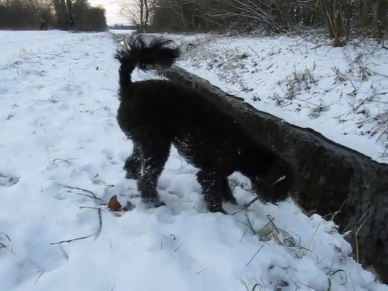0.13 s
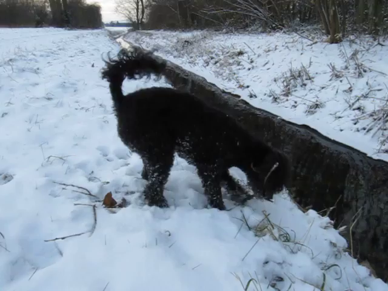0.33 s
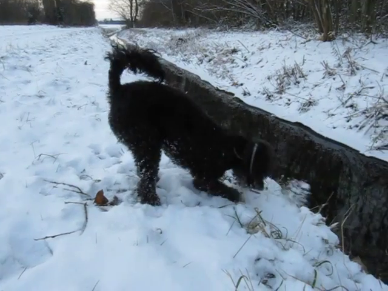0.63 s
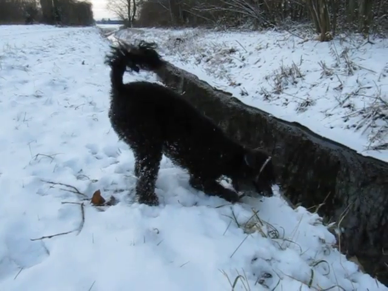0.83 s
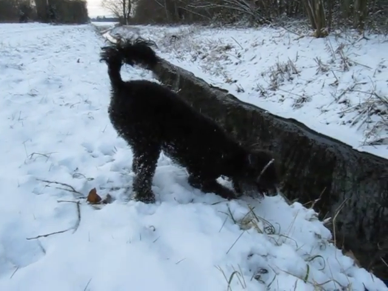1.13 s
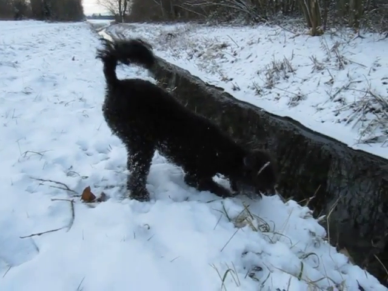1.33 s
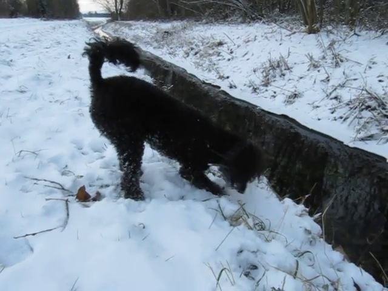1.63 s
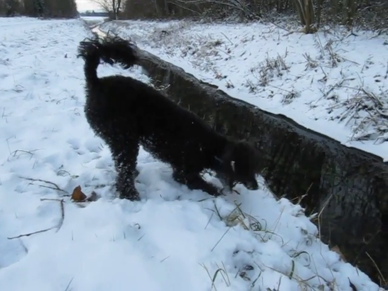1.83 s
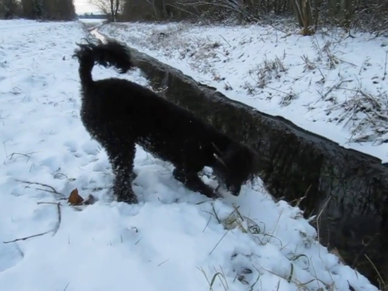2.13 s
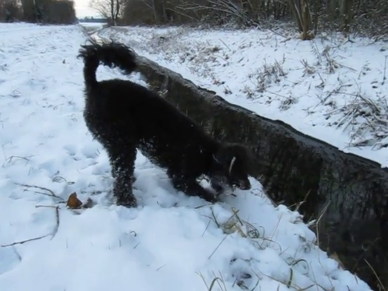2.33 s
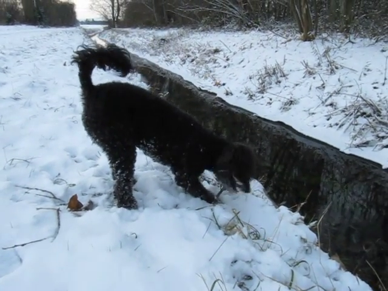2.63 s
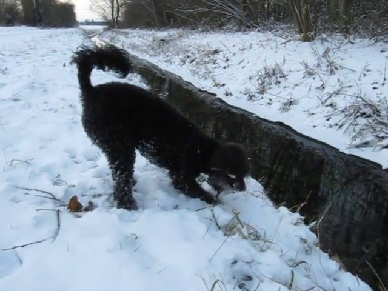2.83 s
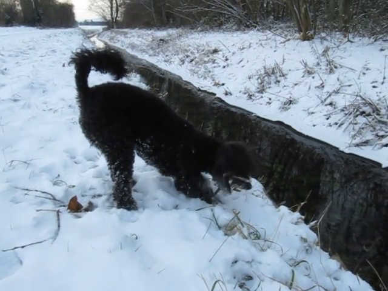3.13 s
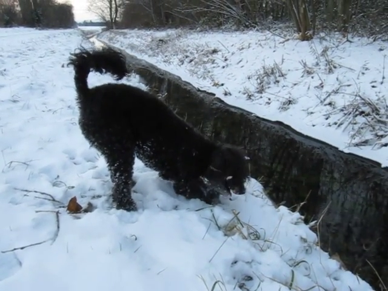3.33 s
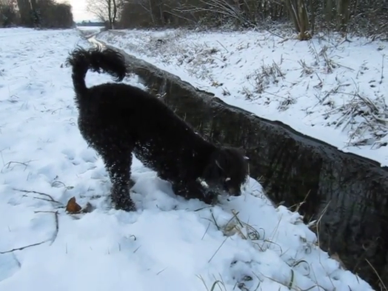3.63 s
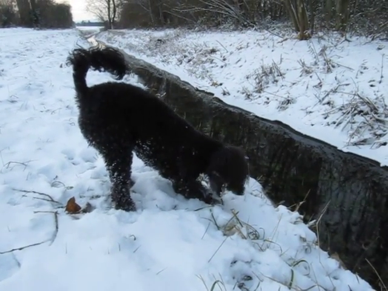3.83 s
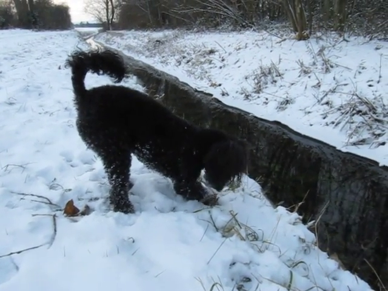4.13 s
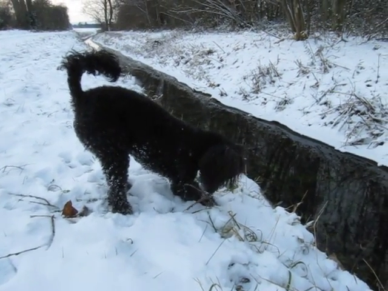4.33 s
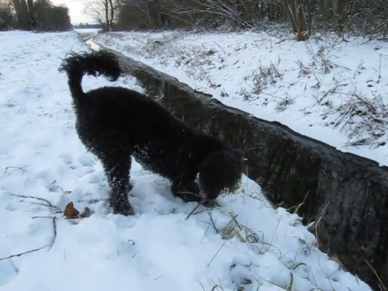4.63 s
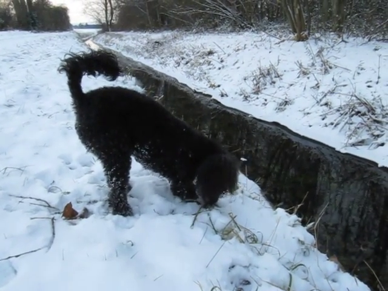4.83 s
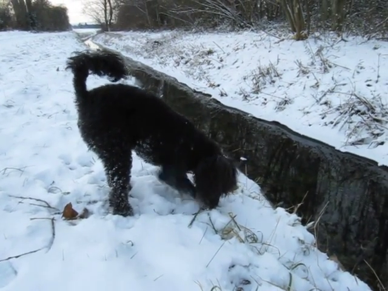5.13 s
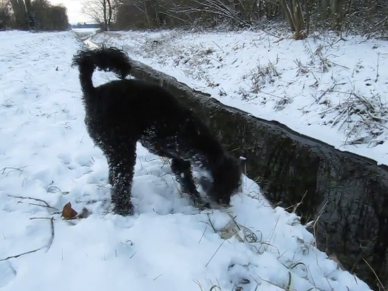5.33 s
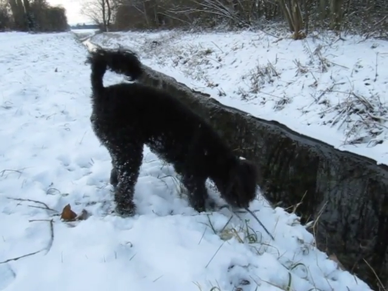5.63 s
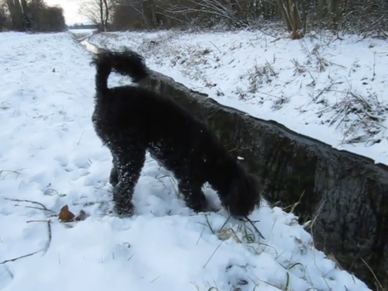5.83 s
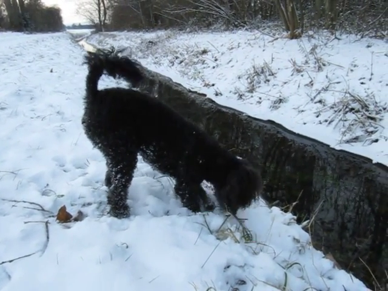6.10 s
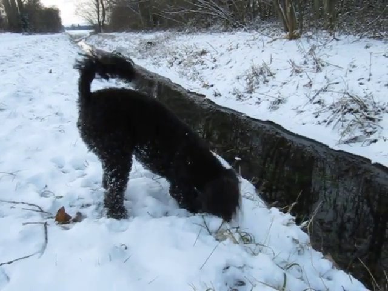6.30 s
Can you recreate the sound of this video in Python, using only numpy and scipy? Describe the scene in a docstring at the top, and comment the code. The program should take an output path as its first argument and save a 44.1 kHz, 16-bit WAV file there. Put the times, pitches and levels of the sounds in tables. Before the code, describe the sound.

Outdoors in quiet snowy country, a dog a few steps from the microphone crunches and scrapes crusty snow in a dense opening burst. Soft rustling follows, then sharp dry twig snaps and glassy ice ticks, more brief scrapes, another hard crack, a lull, and a final run of crisp digging strokes. Behind lie faint wind rumble and a distant throbbing low engine drone.

```python
"""A dog paws and noses in crusty snow beside a ditch: each stroke is noise and random crystal fractures. It
tugs at buried twigs and ice that snap as damped ringing in splintering noise; claws rasp on wood. A faint echo
from the bank follows, as a decaying noise tail. Behind lie a distant hush humped near 600 Hz and a light wind
rumble (shaped noise), the swelling drone of a far engine (two beating sines) and a thin, faint whine (narrow
noise)."""
import sys
import numpy as np
from scipy import signal
from scipy.fft import rfft, irfft, next_fast_len
from scipy.io import wavfile
from scipy.ndimage import map_coordinates

SR = 44100
rng = np.random.default_rng(int(sys.argv[2]) if len(sys.argv) > 2 else 0)


def wrap_up_sound(samples):
    """Save the sound to the file named by the first command line argument, as 16-bit audio."""
    columns = np.atleast_2d(samples).T
    # keep every value between -1 and 1, then stretch to whole-number steps
    tamed = np.clip(columns, -1, 1)
    steps = np.round(tamed * 32767).astype(np.int16)
    wavfile.write(sys.argv[1], SR, steps)


N = 285047

# How much loose snow the dog stirs. Each row: time in seconds, level in dB.
STIR_LEVELS = [(0, -56), (.2, -51), (.7, -56), (1.15, -64), (1.4, -64), (1.57, -56), (1.8, -66.5),
               (2.5, -64), (3.17, -56.5), (3.45, -66), (3.85, -59), (4.3, -67), (4.65, -66), (5.0, -60.5),
               (5.42, -57), (5.58, -63.5), (6.0, -63), (6.46, -57)]
STEP_RISE_S, STEP_FALL_S = 0.006, 0.028
OVERTONE_RATIO = 2.02  # a twig's second resonance over its first
ICE_PIVOT_HZ = 7430  # brightness tilts the ring about this pitch
CRUMBS_PER_S, CRUMB_ABOVE_STIR_DB, CRUMB_SPREAD_DB = 10, 3, 1.7
ENGINE_HZ, ENGINE_WANDER_HZ, ENGINE_DB, ENGINE_WAVER_DB = 50.6, 1.12, -55.6, 1.5
BEAT_HZ, BEAT_SHARE = 3.5, 0.51  # a weaker note just below makes the drone throb
ECHO_DB = -23
TOP_HZ, TOP_SLOPE_HZ = 16100, 500


def amp(db):
    """Decibels to gain."""
    return 10 ** (np.asarray(db) / 20)


def unit(x):
    """Scale to rms 1."""
    return x / np.sqrt(np.mean(x ** 2) + 1e-20)


def along(points, hz):
    """Interpolate (Hz, value) points on a log frequency axis."""
    point_hz, values = np.transpose(points)
    return np.interp(np.log(hz + 1), np.log(point_hz + 1), values)


def curve(rows):
    """Interpolate (s, value) rows to one value per sample."""
    return np.interp(np.arange(N) / SR, *np.transpose(rows))


def wobble(rate_hz):
    """A smooth random curve through rate_hz random knots a second."""
    knots = rng.standard_normal(int(N * rate_hz / SR) + 4)
    return map_coordinates(knots, [np.arange(N) * rate_hz / SR])


def filtered(x, response):
    """Multiply the spectrum of x by a response of frequency in Hz."""
    size = next_fast_len(N + SR // 2)
    gain = response(np.fft.rfftfreq(size, 1 / SR))
    return irfft(rfft(x, size) * gain, size)[:N]


def coloured(x, spectrum):
    """Shape x by a (Hz, dB) spectrum, at rms 1."""
    return unit(filtered(x, lambda hz: amp(along(spectrum, hz))))


def band(x, hz, octaves):
    """Causal band-pass around hz, octaves wide."""
    edges_hz = hz * 2 ** (np.array([-octaves, octaves]) / 2)
    edges_hz = np.clip(edges_hz, 20, SR / 2 - 100)
    return signal.sosfilt(signal.butter(2, edges_hz, "band", fs=SR, output="sos"), x)


def add(track, s, sound):
    """Mix a short sound into a track at time s."""
    part = track[round(s * SR):][:len(sound)]
    part += sound[:len(part)]


def crystals(rate_hz, spread_db, rub):
    """Tiny fractures of uneven size at random moments, plus a share of smooth rubbing noise."""
    breaks = rng.random(N) < rate_hz / SR
    sizes = amp(spread_db * np.clip(rng.standard_normal(N), -2, 2))
    signs = rng.choice([-1, 1], N)
    return unit(breaks * sizes * signs) + rub * rng.standard_normal(N)


def stroke(s, db, rise_s, fall_s):
    """Force of one stroke: it builds up to its peak at s and lets go."""
    u = np.arange(N) / SR - s
    near = (u > -3 * rise_s) & (u < 4 * fall_s)
    u = u[near]
    decay = np.where(u < 0, (u / rise_s) ** 2, np.abs(u / fall_s) ** 1.48)
    force = np.zeros(N)
    force[near] = amp(db) * np.exp(-decay)
    return force


def snow():
    """Strokes crush the crust; each also packs the deeper snow by its own amount, which sounds lower."""
    # A paw breaks through the crust. Each row: peak in seconds, level in dB, packing in dB.
    step_rows = [(.039, -46.5, 1.5), (.119, -34, -9), (.266, -41.5, 6), (.328, -37, 2.5), (.579, -41, 3.5),
                 (2.942, -48, -1), (3.28, -50, -5), (4.072, -52.5, -4), (5.328, -53.5, 8), (5.557, -46, 3),
                 (6.031, -48.5, 4)]
    # Paw or snout drags through snow. Each row: peak in seconds, level in dB, half length in seconds,
    # packing in dB.
    scrape_rows = [(.075, -48.5, .018, -10), (0.149, -38, 0.028, 0), (0.229, -45, 0.034, 4.5),
                   (0.305, -42, .027, 5), (.394, -43, .028, -10), (0.498, -54, 0.048, 7),
                   (0.999, -52, 0.04, 0), (1.272, -55, .016, -6), (1.685, -53.5, .022, -12),
                   (1.968, -59.5, .014, -2), (2.139, -55, .015, -2), (2.176, -51.5, 0.017, 4),
                   (2.438, -57, 0.0091, -2), (2.593, -54, 0.016, 2), (2.67, -60, .06, -2),
                   (3.009, -47, 0.027, -2), (3.07, -53, .02, -2), (3.137, -45.5, .032, -4),
                   (4.763, -58.5, 0.045, 1), (5.117, -53, 0.018, 11.5), (5.161, -40, 0.033, 2),
                   (5.202, -41, .028, 5), (5.44, -52, .063, -9), (5.623, -39.5, 0.03, 3),
                   (5.69, -49.5, .045, 7), (5.837, -39, .014, 0), (5.874, -51, 0.018, 2),
                   (5.928, -48.5, .018, 2.5), (6.076, -45, .03, -4), (6.12, -40, .007, -12),
                   (6.208, -48.5, 0.043, -3), (6.274, -47.5, 0.017, -1), (6.455, -47, 0.024, 4)]
    # Spectra of crust, packed and loose snow. Each row: frequency in Hz, relative level in dB per Hz.
    crust_spectrum = [(150, -19.5), (1100, -17), (1700, -6.5), (2450, -13.5), (3300, -4.5), (4400, -1.4),
                      (5700, -2), (8100, -1.5), (9500, 2), (10200, -1), (11900, -14.5), (15500, -23.5)]
    packed_spectrum = [(100, -16), (300, -6), (600, -9), (1100, -6.5), (1750, -1.5), (2450, -5.5),
                       (3400, 0.5), (5000, -8), (9000, -32)]
    loose_spectrum = [(800, -16), (2400, -5.5), (4000, -2.5), (6000, -5), (8200, -3), (9700, -2),
                      (11800, -15), (15500, -20)]

    strokes = [(s, db, STEP_RISE_S, STEP_FALL_S, packing_db) for s, db, packing_db in step_rows]
    strokes += [(s, db, half_s, half_s, packing_db) for s, db, half_s, packing_db in scrape_rows]
    crust_power, packed_power = np.zeros(N), np.zeros(N)
    for s, db, rise_s, fall_s, packing_db in strokes:
        power = stroke(s, db, rise_s, fall_s) ** 2
        crust_power += power
        packed_power += power * amp(packing_db) ** 2

    crust_grains = crystals(rate_hz=3600, spread_db=4.5, rub=0.74)
    crunch = np.sqrt(crust_power) * coloured(crust_grains, crust_spectrum)
    packed_grains = crystals(rate_hz=1200, spread_db=2.5, rub=0.5)
    packing = amp(-10.5) * np.sqrt(packed_power) * coloured(packed_grains, packed_spectrum)
    loose_grains = crystals(rate_hz=1600, spread_db=6.5, rub=1.03)
    stir = amp(curve(STIR_LEVELS) + 1.0 * wobble(11))
    loose = stir * coloured(loose_grains, loose_spectrum)
    judder = amp(1.3 * wobble(110))  # the crust gives way in small jerks
    return (crunch + packing + loose) * judder


def rasps():
    """A claw catches and slips on buried wood, which sounds at its own pitch."""
    # Each row: peak in seconds, level in dB, half length in seconds, pitch in Hz.
    rasp_rows = [(0.328, -48, .012, 1650), (.802, -51, .003, 2200), (1.398, -56, .004, 2500),
                 (2.222, -52.5, 0.023, 2840), (3.08, -51.5, 0.0074, 2150), (5.562, -51, 0.011, 1780)]
    out, t = np.zeros(N), np.arange(N) / SR
    for s, db, half_s, hz in rasp_rows:
        swell = np.exp(-((t - s) / half_s) ** 2)
        slips = crystals(rate_hz=900, spread_db=3, rub=0.5)
        out += amp(db) * swell * unit(band(slips, hz, octaves=0.91))
    return out


def fracture(hz, octaves, t60_s, tone):
    """Splintering noise plus tone times a damped ringing; energy of rms 1 over 4 ms."""
    t = np.arange(SR // 30) / SR
    fade = amp(-60 * t / t60_s) * (1 - np.exp(-t / 0.00043))
    splinters = unit(band(rng.standard_normal(len(t)) * fade, hz, octaves))
    ringing = unit(fade * np.sin(2 * np.pi * (hz * t + rng.random())))
    burst = splinters + tone * ringing
    return burst * np.sqrt(0.004 * SR / np.sum(burst ** 2))


def chink(bright_db):
    """One glassy crack of the crust: its resonances tilted by bright_db per octave."""
    # Each row: frequency in Hz, level in dB, width in octaves, t60 in seconds, ringing over splinters.
    ice_modes = [(5600, -4.5, 0.99, 0.004, 0.29), (9400, 0, 0.33, .0047, 0.64), (12800, -15, .3, 0.0023, 0)]
    return sum(amp(db + bright_db * np.log2(hz / ICE_PIVOT_HZ)) * fracture(hz, octaves, t60_s, tone)
               for hz, db, octaves, t60_s, tone in ice_modes)


def snaps():
    """A twig rings at its pitch and an overtone, longer when lower, knocks the ground and cracks the crust."""
    # Each row: start in seconds, level in dB, pitch in Hz, overtone in dB relative to the level,
    # cracking crust in dB relative to the level, before a 1.5 dB cut.
    snap_rows = [(0.204, -40.5, 1800, -13, -18), (1.2848, -50.5, 1880, -1, 9), (1.4951, -45.5, 1630, -7, 1),
                 (1.5315, -31, 2850, -3, 2.5), (1.6199, -39.5, 2720, -2, -6), (1.6508, -25.3, 2600, 0, 4.8),
                 (1.7554, -47.5, 1930, -10, -14), (3.5899, -54.5, 1850, 3.5, -4),
                 (3.632, -43.5, 2210, 2.5, -4.5), (3.6893, -52, 1850, 6, -3), (3.694, -50, 1850, 10, 4),
                 (3.6992, -48, 1790, 10, -2), (3.702, -30.5, 1840, 3.5, -3), (3.711, -29.5, 1800, 3.5, 2),
                 (3.713, -34, 2200, 7, -12), (3.7165, -26, 2650, -20, -5), (3.8681, -50, 1900, -10, -8),
                 (5.5548, -52, 1680, -7, 2), (6.1168, -48, 2600, 8.5, 3), (6.3177, -54.5, 1780, -1, -3)]
    wood, crust = np.zeros(N), np.zeros(N)
    for s, db, hz, overtone_db, crust_db in snap_rows:
        ring = fracture(hz, octaves=0.8, t60_s=19 / hz, tone=0.9)
        overtone = fracture(OVERTONE_RATIO * hz, octaves=0.79, t60_s=10.7 / hz, tone=0.55)
        knock = amp(-24) * fracture(560, octaves=1.25, t60_s=0.011, tone=0)
        add(wood, s, amp(db) * (ring + amp(overtone_db) * overtone + knock))
        add(crust, s, amp(db + crust_db - 1.5) * chink(bright_db=3))
    # a thin twig radiates little bass, and wet wood swallows the top octave
    radiation = signal.butter(3, [280, 8800], "band", fs=SR, output="sos")
    return signal.sosfilt(radiation, wood) + crust


def ice():
    """The crust cracks under the dog; stray crumbs tick louder the more the snow is stirred."""
    # Each row: start in seconds, level in dB, brightness in dB per octave.
    chink_rows = [(.4577, -49, -4), (1.4114, -53, 3), (1.4732, -50, 5), (1.4776, -43.5, 12),
                  (1.489, -47, 10), (1.521, -37.5, 13), (1.6153, -42, 0), (1.663, -45, -2),
                  (1.8924, -49, -16), (1.8974, -53, -5), (2.5314, -47, 1), (2.6, -50, -8), (2.969, -47, 6),
                  (3.1308, -46, -12), (3.2062, -45, -5), (3.2785, -42.5, -6), (3.318, -48.5, 7),
                  (3.868, -41.5, -11), (4.0676, -49, -11), (4.782, -53, -8), (5.9355, -47, -11)]
    out = np.zeros(N)
    for s, db, bright_db in chink_rows:
        add(out, s, amp(db) * chink(bright_db))
    crumb_db = curve(STIR_LEVELS) + CRUMB_ABOVE_STIR_DB
    for i in np.flatnonzero(rng.random(N) < CRUMBS_PER_S / SR):
        db = crumb_db[i] + CRUMB_SPREAD_DB * rng.standard_normal()
        add(out, i / SR, amp(db) * chink(bright_db=-7.5))
    return out


def echo(x):
    """Diffuse answer of the ditch bank and the trees: noise decaying at a rate set by frequency."""
    # Each row: frequency in Hz, t60 in seconds.
    bank_t60 = [(300, .35), (3000, 0.19), (12000, 0.32)]
    hz, t, bins = signal.stft(rng.standard_normal(SR // 2), SR, nperseg=256)
    decay = amp(-60 * t / along(bank_t60, hz)[:, None])
    tail = signal.istft(bins * decay, SR, nperseg=256)[1]
    return signal.fftconvolve(x, tail / np.linalg.norm(tail))[:N]


def distant_hush():
    """Distant hush: shaped noise at a slowly wavering level."""
    # Each row: frequency in Hz, relative level in dB per Hz.
    air_spectrum = [(100, -4), (230, -2), (400, -2), (620, -0.5), (950, -3), (1400, -9), (2200, -15.5),
                    (5500, -22), (9500, -24), (12000, -30), (15500, -34)]
    return amp(-56.5 + 0.47 * wobble(2.85)) * coloured(rng.standard_normal(N), air_spectrum)


def wind():
    """Soft wind rumble: low noise at a wavering level."""
    # Each row: frequency in Hz, relative level in dB per Hz.
    rumble_spectrum = [(10, -18), (25, 0.5), (38, -1.5), (60, -3.5), (85, -11.5), (110, -11.5), (170, -19),
                       (300, -38), (900, -80)]
    return amp(-53.0 + 1.35 * wobble(4.0)) * coloured(rng.standard_normal(N), rumble_spectrum)


def engine_note(hz):
    """A sine whose pitch wanders about hz."""
    return np.sin(2 * np.pi * np.cumsum(hz + ENGINE_WANDER_HZ * wobble(5)) / SR)


def far_engine():
    """Two close low notes beat into a throbbing drone that swells."""
    # Each row: peak in seconds, rise in dB, half length in seconds.
    swell_rows = [(2.398, 7, .42), (3.566, 12, 0.31), (6.2, 3.5, 0.18)]
    t = np.arange(N) / SR
    swell_db = sum(db * np.exp(-((t - s) / half_s) ** 2) for s, db, half_s in swell_rows)
    throb = unit(engine_note(ENGINE_HZ) + BEAT_SHARE * engine_note(ENGINE_HZ - BEAT_HZ))
    return amp(ENGINE_DB + swell_db + ENGINE_WAVER_DB * wobble(9.9)) * throb


def whine():
    """A thin, faint whine: noise in a very narrow band."""
    return amp(-80.5) * unit(band(rng.standard_normal(N), hz=7780, octaves=0.014))


def scene():
    """The dog a few steps away, in open country."""
    dog = snow() + rasps() + snaps() + ice()
    background = distant_hush() + wind() + far_engine() + whine()
    return (dog + amp(ECHO_DB) * echo(dog) + background)[None]


def record(dry):
    """Band limit: the gain slopes to zero at TOP_HZ."""
    return filtered(dry[0], lambda hz: np.clip((TOP_HZ - hz) / TOP_SLOPE_HZ, 0, 1))[None]


dry = scene()
out = record(dry)
wrap_up_sound(out)
```